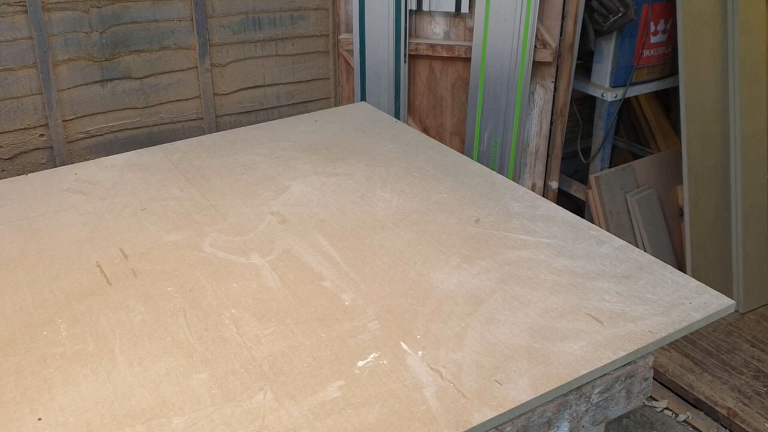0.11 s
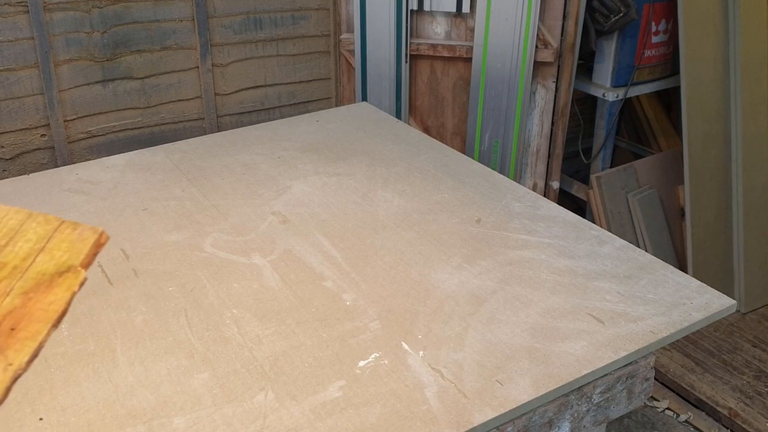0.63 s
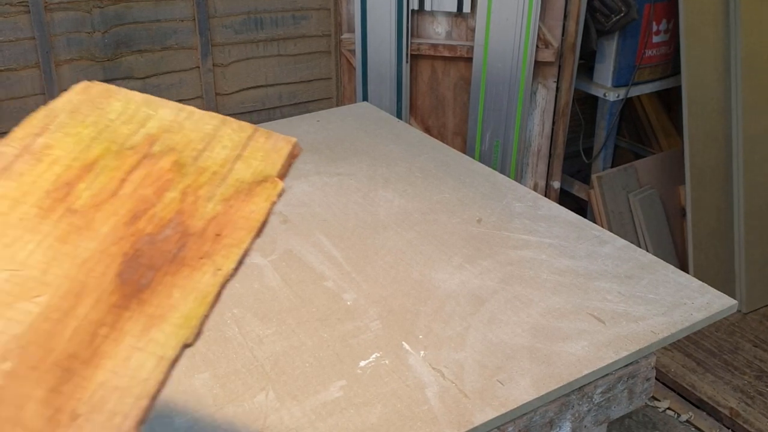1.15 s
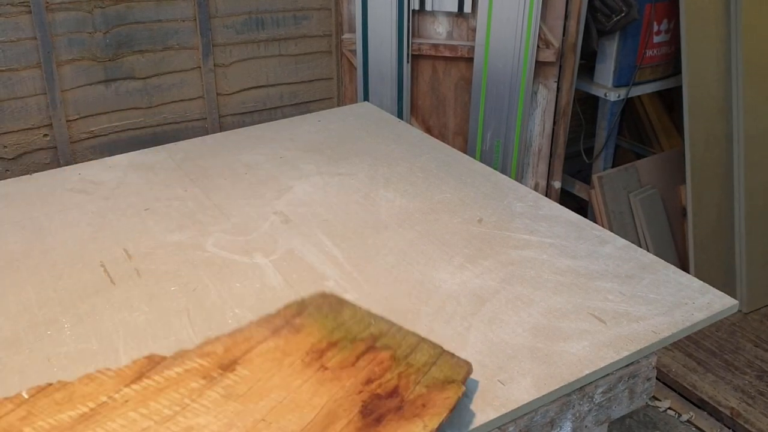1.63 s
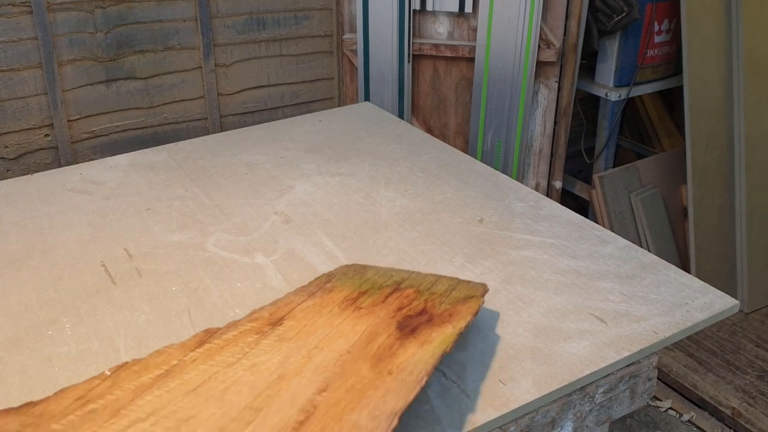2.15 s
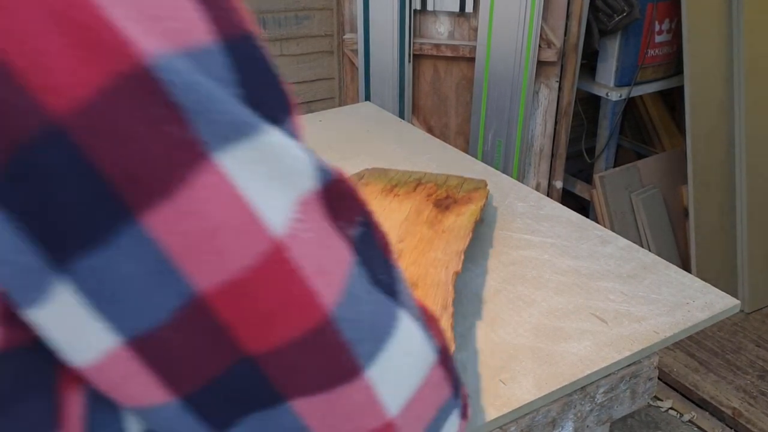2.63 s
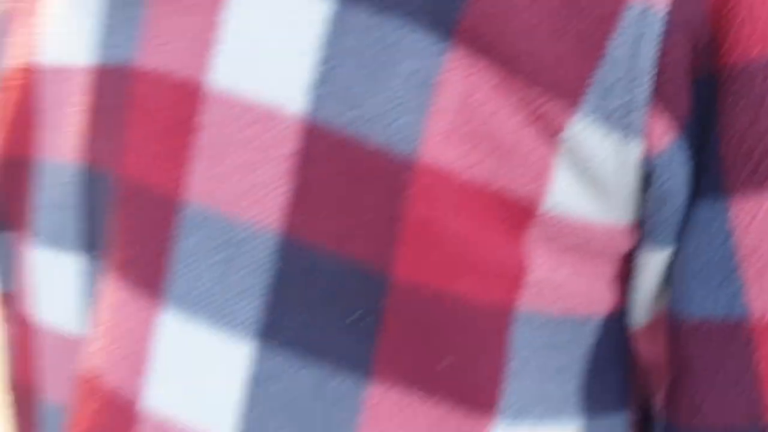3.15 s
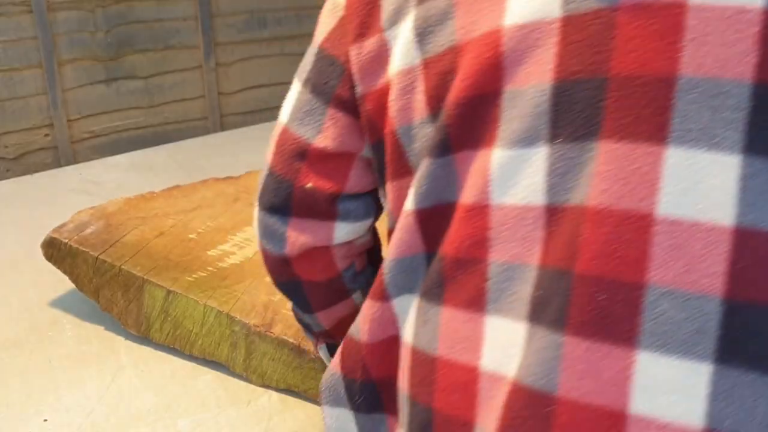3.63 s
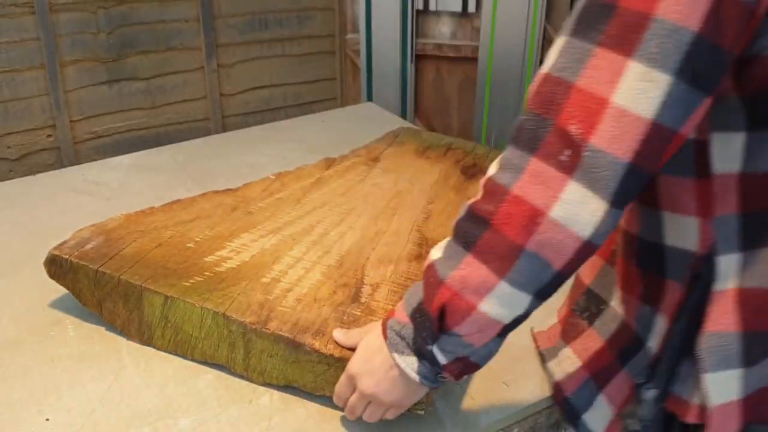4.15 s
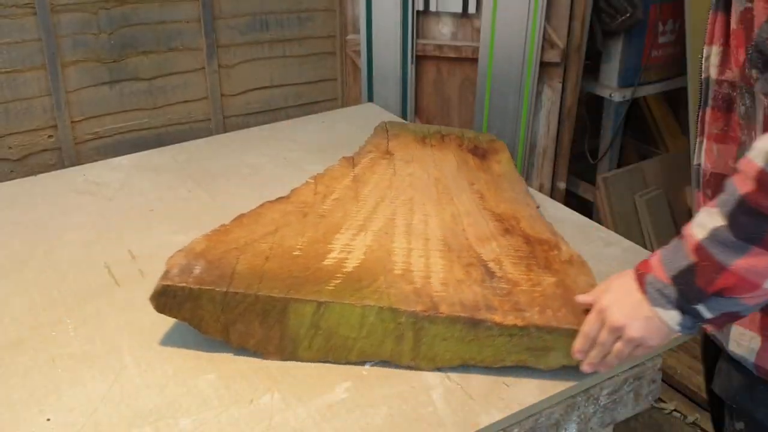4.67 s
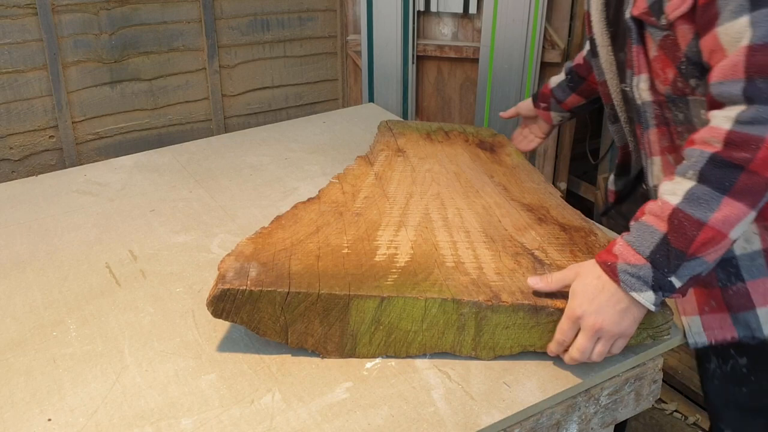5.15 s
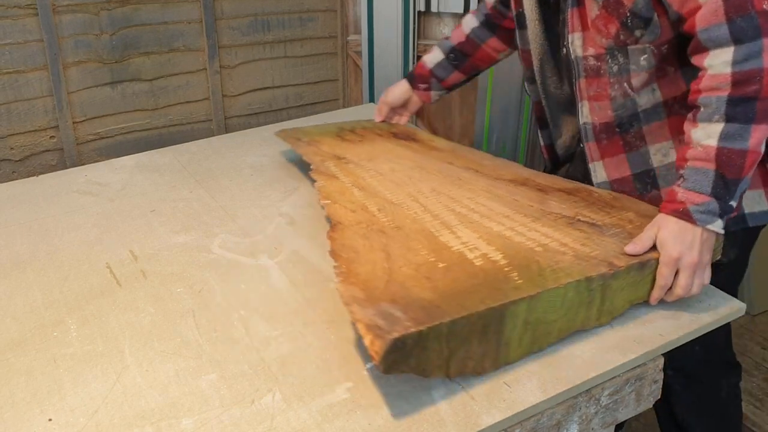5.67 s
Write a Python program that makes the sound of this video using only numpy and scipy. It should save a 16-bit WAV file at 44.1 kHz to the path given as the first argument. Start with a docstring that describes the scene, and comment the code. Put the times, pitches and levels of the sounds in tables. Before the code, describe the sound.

A heavy wooden slab slams onto a bench with a deep boom, is dropped again, scraped about, and lands with a final solid thud.

```python
"""A heavy wooden slab is carried in, dropped on a workbench, rocked and slid about in a small wooden shed.
Each blow rings the modes of the bench and slab, with a deep boom a moment later, a crack and a clatter.
Scuffs and drags are grainy noise coloured by the same wood; ticks are tiny noise bursts, and a groan is
a wavering tone. A low rumble and faint hiss fill the shed.
A close pair of microphones hears it all a little louder on the left."""
import sys
import numpy as np
from scipy import signal
from scipy.fft import rfft, irfft, next_fast_len
from scipy.io import wavfile
from scipy.ndimage import uniform_filter1d

SR = 44100
rng = np.random.default_rng(int(sys.argv[2]) if len(sys.argv) > 2 else 0)


def transcribe(u):
    """Save the signal u as a 16-bit wav file named by the first command-line argument.

    u: samples, shape (n,) or (channels, n), limited to [-1, 1]; the rate is SR.
    q: integer samples, one column per channel.
    """
    v = np.clip(np.atleast_2d(u).T, -1, 1)
    q = np.round(v * 32767).astype(np.int16)
    wavfile.write(sys.argv[1], SR, q)


def rack_gain(trim_db):
    """Turn a fader trim in dB into the linear factor to multiply a signal by."""
    fader = np.asarray(trim_db, float)
    return 10 ** (fader / 20)


N = 255055  # length in samples
HZ = np.maximum(np.arange(N // 2 + 1) * SR / N, 1)  # frequency of every bin


def over_hz(table):
    """Read a (frequency, value) table at every bin, in straight lines over log frequency."""
    hz, value = np.transpose(table)
    return np.interp(np.log(HZ), np.log(hz), value)


def colour(x, gain):
    """Weight every frequency bin by its gain."""
    return irfft(rfft(x) * gain, N)


def unit(x):
    """Scale to rms 1."""
    return x / np.sqrt(np.mean(x ** 2))


def add(out, s, x):
    """Mix x into out from time s."""
    i = int(s * SR)
    out[..., i:i + x.shape[-1]] += x[..., :N - i]


def walk(rate):
    """Random levels with rms 1, held 1 / rate seconds and smoothed twice."""
    hold = int(SR / rate)
    steps = np.repeat(rng.standard_normal(N // hold + 1), hold)
    smooth = uniform_filter1d(uniform_filter1d(steps, hold), hold)
    return unit(smooth[:N])


def rise_and_fall(t, s, hold, rise, fall):
    """Level in dB: climbs 20 dB per rise time up to s, holds, sinks 20 dB per fall time."""
    before = np.maximum(s - t, 0)
    after = np.maximum(t - s - hold, 0)
    return -20 * (before / rise + after / fall)


# likeness of the two microphones: (frequency [Hz], share alike [0-1])
MICROPHONES_ALIKE = [(60, 1), (250, 0.89), (600, 0.65), (1200, 0), (2500, 0.09), (8000, 0)]


def pair(x, other):
    """Two microphones: alike in the bass, hardly related in the treble."""
    alike = np.clip(over_hz(MICROPHONES_ALIKE), 0, 1)
    mid = colour(x, np.sqrt((1 + alike) / 2))
    side = colour(other, np.sqrt((1 - alike) / 2))
    return np.array([mid + side, mid - side])


def grit(spectrum, spiky_db, flicker_db, rate):
    """Dense grains of uneven size under a flickering pressure, coloured, for both microphones."""
    size = rack_gain(spiky_db * rng.exponential(size=N) + flicker_db * walk(rate))
    grains = pair(size * rng.standard_normal(N), size * rng.standard_normal(N))
    return unit(colour(grains, rack_gain(over_hz(spectrum))))


# colour of the low rumble and faint hiss: (frequency [Hz], relative level per Hz [dB])
SHED_COLOUR = [(12, -58), (20, -19), (49, 3), (86, -0.5), (168, -12.5), (285, -16.5), (347, -19),
               (590, -23.5), (923, -21.5), (1530, -34), (2320, -44), (6540, -50), (7730, -58),
               (11400, -45.5), (16000, -58)]


def shed_noise(level_db=-50):
    """The low rumble and faint hiss that fill the shed: gently flickering coloured noise."""
    return rack_gain(level_db) * grit(SHED_COLOUR, 0.3, 1.2, 12)


# short scuffs of shoes, sleeves and slab edge:
# (time [s], hold [s], grit level [dB], woodiness over grit [dB], dustiness over grit [dB])
SCUFF_EVENTS = [(0.033, 0.096, -49, -1.5, -6), (0.116, 0.064, -52, 4.5, -4.5), (0.26, 0.054, -55, 6, -1),
                (0.627, 0.035, -77, -0.5, 2), (0.895, 0.059, -83.5, 16, 3), (0.99, .03, -62, 1.5, -7),
                (1.051, 0.022, -51, 4.5, -2), (1.135, 0.12, -71, 8, -2), (1.479, 0.0017, -76.5, 11, 9.5),
                (1.618, 0.021, -61.5, -1.5, -15), (1.673, 0.0017, -52, 21.5, -10),
                (1.696, 0.014, -45.5, 0, -1.5), (1.856, 0.042, -42.5, 7, -6.5),
                (2.059, 0.019, -64, 11.5, -15), (2.445, .006, -60, 9.5, -4), (2.522, 0.023, -49.5, -7.5, 1),
                (2.927, .006, -53.5, 11, -6), (3.02, 0.043, -57.5, 6.5, -4),
                (3.101, 0.0025, -51.5, 1.5, -10.5), (3.168, 0.0038, -57, 5, -12), (3.22, 0.048, -52, 1, -3),
                (3.332, 0.11, -60.5, 7, -7.5), (3.525, 0.06, -66, 6.5, -1.5), (3.599, .004, -50.5, 1, -1.5),
                (3.674, 0.12, -65.5, 2, -5), (3.818, 0.012, -60.5, 12.5, -6),
                (3.888, 0.12, -67.5, 5.5, 0.5), (4.05, 0.047, -58.5, 1.5, -5.5),
                (4.705, 0.024, -46, -7, -8), (5.006, 0.035, -59, 3, 0.5), (5.195, 0.21, -65.5, 7, -0.5),
                (5.276, 0.0057, -46, -2, -10.5), (5.769, 0.022, -47.5, -3, -6)]


def scuffs(t, rise_s=0.0042, rise_per_hold=0.49, fall_s=0.075, grumble_db=-2):
    """Short rubs swell, hold and fade: summed powers of grit, dust, rasp and grumble over time."""
    power = np.zeros((4, len(t)))
    for s, hold, db, wood_db, dust_db in SCUFF_EVENTS:
        # longer scuffs also rise more slowly
        db = db + rise_and_fall(t, s, hold, rise_s + rise_per_hold * hold, fall_s)
        rasp_db = db + wood_db
        power += rack_gain([db, db + dust_db, rasp_db, rasp_db + grumble_db]) ** 2
    return power


def scatter(x, drift_hz=2.5, decay_s=0.009, level_db=-4):
    """Early echoes off bench top and planks comb the sound into bands that shift as the contact moves."""
    echoes = rng.standard_normal((2, 2, 2048)) * np.exp(-np.arange(2048) / SR / decay_s)
    echoes = rack_gain(level_db) * echoes / np.sqrt(np.sum(echoes ** 2, axis=2, keepdims=True))
    # a wandering angle blends one cluster of echoes into the other
    turn = 2 * walk(drift_hz)
    moving = np.zeros((2, N))
    for share, cluster in zip((np.cos(turn), np.sin(turn)), echoes):
        moving += signal.fftconvolve(share * x, cluster, axes=1)[:, :N]
    return (x + moving) / np.hypot(1, rack_gain(level_db))


# colours of the four rubbing sounds, each: (frequency [Hz], relative level per Hz [dB])
SAND_COLOUR = [(1710, -57), (2900, -4), (3440, -3), (3800, -3.5), (5020, -5.5), (6470, -7.5), (7500, -14),
               (9750, -57), (16500, -120)]
DUST_COLOUR = [(4290, -9), (7300, -3), (8470, -3.5), (12500, -0.5), (13700, -8), (15100, -2), (15800, -37)]
RASP_COLOUR = [(760, -16), (1300, -8), (1360, -3), (1600, -2.5), (1800, -4), (2280, -2), (2560, -7),
               (3100, -3.5), (4030, -16), (6820, -120)]
GRUMBLE_COLOUR = [(120, -60), (200, -6), (237, -6.5), (275, -8.5), (329, -3.5), (371, -11.5), (498, -7.5),
                  (591, -7), (724, -10), (773, -3.5), (1010, -8.5), (1180, -6), (1400, -11.5), (1820, -30),
                  (3080, -120)]


def slide(ring_db=3, blur=1.43):
    """Wood on wood and shoes on the floor: grit, dust, and a rasp and grumble that wake the wood's modes."""
    t = np.arange(0, N, 32) / SR
    power = scuffs(t) + drags(t)
    gains = [np.interp(np.arange(N) / SR, t, np.sqrt(p)) for p in power]
    sandy, dusty, raspy, grumbly = gains
    # each mode is a peak in the wood's response; quickly dying modes are wider
    peaks = 0
    for hz, _, t60, _, _ in WOOD_MODES:
        width = blur * np.log(1000) / np.pi / t60
        peaks = peaks + 1 / (1 + (2 * (HZ - hz) / width) ** 2)
    wood = 1 + rack_gain(ring_db) * peaks
    surface = sandy * grit(SAND_COLOUR, 2.6, 1.4, 40) + dusty * grit(DUST_COLOUR, 1.8, 1.67, 40)
    rasp = unit(colour(grit(RASP_COLOUR, 3.08, 2.1, 30), wood))
    grumble = unit(colour(grit(GRUMBLE_COLOUR, 2.86, 1.28, 18), wood))
    return scatter(surface + raspy * rasp) + grumbly * grumble


# ringing modes of bench and slab: (frequency [Hz], relative level [dB], time to die by 60 dB
# before muffling [s], swell time [cycles], phase by which the left microphone leads [radians])
WOOD_MODES = [(64.6, -1.5, 0.22, 0.18, -0.2), (77.5, 7, 0.4, 1.03, 0.17), (102.5, 3, 0.12, 1.35, 0),
              (152.8, -2.5, 0.18, 0.96, 0.2), (244.8, 3, 0.086, 1.8, 0.18), (321, -6.5, 0.12, 0.36, 0.2),
              (420, -2.5, 0.032, 0.77, 1.2), (502.4, 4, 0.063, 2.7, 0), (566.2, -4.5, 0.35, 0.84, -2.8),
              (649, 3.5, 0.091, 1.6, 3.2), (717.3, -3, 0.071, 0.39, 0.6), (955, -1.5, 0.036, 0.25, 1.5),
              (1113.5, -2, 0.033, 1.8, -0.76), (1247, -4.5, 0.057, 0.37, 2), (1429, -11, 0.053, 0.58, -3),
              (1629, -4.5, 0.02, 1.4, 1), (1907, 3, 0.011, 2.1, -3.5), (2124, -26, 0.088, 1.6, -7),
              (2330, -32.5, 0.066, 1.6, -0.8), (2550, -32, 0.0097, 0.84, 10), (2692, -33, 0.072, 1.8, -1.6)]
# borders between five families of modes, boom, thud, body, knock and crack: (frequency [Hz])
FAMILY_BORDERS = [120, 190, 380, 850]
# blows: (time [s], body level [dB], boom level [dB], knock level [dB], crack level [dB])
BLOW_EVENTS = [(0.316, -36.5, -50, -49, -44), (0.492, -46, -65, -59, -59), (0.98, -52, -58, -53.5, -64),
               (1.388, -53, -47, -75, -72), (1.599, -47, -57, -53.5, -60), (1.67, -9, -23, -13.5, -13.5),
               (1.683, -26.5, -25, -28, -26), (1.701, -25.5, -29, -30, -35), (1.769, -20, -26, -28.5, -54),
               (1.8, -39, -32, -53, -62), (1.849, -55, -39, -52, -41), (1.888, -35, -29, -40, -25),
               (1.897, -22.5, -29.5, -32, -47), (1.917, -25, -29.5, -36, -47), (1.939, -26, -51, -58, -62),
               (2.868, -15, -26, -33.5, -30), (2.876, -14, -32.5, -22.5, -23.5),
               (2.889, -22.5, -20.5, -31, -38), (3.005, -25.5, -19, -30.5, -39),
               (3.014, -25.5, -27, -36, -32.5), (3.045, -25, -34.5, -52, -52), (3.125, -28, -42, -43, -51),
               (3.181, -42, -37.5, -59, -65), (3.227, -42, -39.5, -62, -58), (3.328, -36, -62, -47, -61),
               (3.362, -27, -27.5, -51, -63), (3.422, -25.5, -34.5, -41.5, -56),
               (3.569, -39.5, -36.5, -54, -66), (3.815, -22, -20, -37, -38), (4.31, -47.5, -38, -61, -59),
               (4.501, -37.5, -57, -49, -44), (4.541, -38.5, -39.5, -44.5, -41),
               (4.731, -39.5, -52, -57, -34.5), (4.993, -44.5, -62, -55, -66),
               (5.284, -56, -56, -60, -38.5), (5.41, -41, -51, -49, -48), (5.456, -30.5, -35, -47, -32.5),
               (5.573, -40, -61, -54, -44), (5.697, -32.5, -39, -51, -46),
               (5.767, -20.5, -12.5, -12, -15.5)]


def blows(scatter_db=2.3, detune=0.0052, crack_s=0.003, rattle_db=-12, rattle_s=0.019,
          splinter_db=-3, clatter_db=-2, clatter_s=0.033):
    """Each blow makes the modes swell, then die; contact adds a splintery crack, a rattle and a clatter."""
    bite_s = 0.0022  # contact begins this long before a blow is heard to bite
    boom_late_s = 0.003
    thud_body, thud_db = 0.8, 1  # the thud lies between boom and body: share of body, added dB
    choke_s, choke_t60_s = 0.058, 1  # the slab settles this late and muffles the ringing
    out = np.zeros((2, N))
    t = np.arange(SR // 2) / SR
    hz, db, t60, swell, lead = np.transpose(WOOD_MODES)[:, :, None]
    family = np.searchsorted(FAMILY_BORDERS, hz)
    # the frame and floor take up the boom a little after the top rings
    age = np.maximum(t - boom_late_s * (family == 0), 0)
    growth = 1 - np.exp(-age * hz / swell)
    decay = np.exp(-np.log(1000) * (age / t60 + np.maximum(age - choke_s, 0) / choke_t60_s))
    sign = (-1.) ** np.arange(len(hz))[:, None]
    chance = rng.standard_normal((len(BLOW_EVENTS), 2, len(hz), 1))
    # the crack dies at once, the rattle lingers
    short = t[:5000]
    fade = np.exp(-short / crack_s) + rack_gain(rattle_db) * np.exp(-short / rattle_s)
    splinters = rng.standard_normal((len(BLOW_EVENTS), 2, 5000)) * fade
    soft = signal.butter(2, [750, 2700], "bandpass", fs=SR, output="sos")
    # countless weak modes of loose boards blur into a dull clatter
    boards = signal.butter(3, [170, 480], "bandpass", fs=SR, output="sos")
    loose = np.exp(-short / clatter_s) / fade
    for event, (level_chance, pitch_chance), noise in zip(BLOW_EVENTS, chance, splinters):
        s, body_db, boom_db, knock_db, crack_db = event
        start = s - bite_s
        thud_db_now = boom_db + thud_body * (body_db - boom_db) + thud_db
        reach_db = np.array([boom_db, thud_db_now, body_db, knock_db, crack_db])[family]
        level = sign * rack_gain(db + reach_db + scatter_db * level_chance)
        wave = np.exp(2j * np.pi * hz * (1 + detune * pitch_chance) * age)
        ring = level * growth * decay * wave
        left, right = (np.sum(ring * np.exp(side * 0.5j * lead), axis=0).imag for side in (1, -1))
        add(out, start, np.array([left, right]))
        add(out, start, rack_gain(crack_db + splinter_db) * signal.sosfilt(soft, noise))
        # the clatter is much the same at both microphones
        clatter = signal.sosfilt(boards, loose * (noise + 2 * noise[0]))
        add(out, start, rack_gain(body_db + clatter_db) * clatter)
    return out


# small dry ticks: (time [s], level [dB])
TICK_EVENTS = [(0.5025, -57), (0.522, -55), (0.5385, -50), (0.6282, -52), (0.661, -55), (0.7125, -56),
               (0.7445, -54.5), (0.791, -56), (0.9896, -54), (1.477, -56.5), (1.6107, -59), (1.813, -41),
               (3.012, -48), (3.105, -37), (3.155, -56), (3.179, -39.5), (4.0567, -50), (5.2745, -36.5)]
# broad rings of a tick: (frequency [Hz], width [Hz], level [dB])
TICK_RINGS = [(4680, 1000, 9), (6850, 1500, -3), (11500, 5000, 1.5)]


def ticks(decay_s=0.0008):
    """Crumbs and fibres snapping: about a millisecond of noise in three broad rings."""
    out = np.zeros(N)
    fade = np.exp(-np.arange(600) / SR / decay_s)
    bursts = rng.standard_normal((len(TICK_EVENTS), 600)) * fade
    for (s, db), noise in zip(TICK_EVENTS, bursts):
        add(out, s, rack_gain(db) * noise)
    rings = sum(rack_gain(db) / (1 + (2 * (HZ - hz) / width) ** 2) for hz, width, db in TICK_RINGS)
    return colour(out, rings)


# the slab dragged over the bench, one list of points per drag:
# (time [s], grit level [dB], woodiness over grit [dB], dustiness over grit [dB])
DRAG_PATHS = [
    [(1.74, -70, 3, -8), (1.8, -58, 4, -11), (2.1, -64, 2.5, -2.5), (2.45, -58.5, 4.5, -2),
     (2.55, -54, 1.5, 2), (2.86, -53, 3, -0.5), (2.93, -55.5, 10.5, -4), (3, -83, 0, -7)],
    [(4.12, -70, 3.5, -1), (4.21, -60.5, 1, -3.5), (4.5, -51, -3.5, -5.5), (4.8, -50, -1.5, -6),
     (4.91, -55, -4.5, -8), (4.98, -74, 4, -10)],
    [(5.3, -80, -8, -15), (5.38, -63, 6, -10), (5.42, -45.5, 2.5, -3), (5.47, -42, -5.5, -1.5),
     (5.63, -49, -6, -2), (5.71, -52, -0.5, 0.5), (5.76, -60, 0.5, 1)],
]


def drags(t, edge_s=0.075, grumble_db=3.5):
    """Long rubs follow their points: summed powers of grit, dust, rasp and grumble over time."""
    power = np.zeros((4, len(t)))
    for path in DRAG_PATHS:
        s, *columns = np.transpose(path)
        db, wood_db, dust_db = (np.interp(t, s, column) for column in columns)
        db = db + rise_and_fall(t, s[0], s[-1] - s[0], edge_s, edge_s)
        rasp_db = db + wood_db
        power += rack_gain([db, db + dust_db, rasp_db, rasp_db + grumble_db]) ** 2
    return power


def groan(waver_db=0.5, waver=0.0061):
    """Stick and slip of the dragged slab lock briefly near one mode: a tone wavering in pitch and level."""
    peak_s, hz, peak_db = 4.735, 241, -39
    rise_s, fall_s = 0.063, 0.044  # times to change by 20 dB
    shape_db = rise_and_fall(np.arange(N) / SR, peak_s, 0, rise_s, fall_s)
    db = peak_db + shape_db + waver_db * walk(60.9)
    phase = 2 * np.pi * np.cumsum(hz * (1 + waver * walk(22))) / SR
    return rack_gain(db) * np.sin(phase)


def room(x, t60_s=0.28, tail_db=-2):
    """Direct sound plus a short noise-like tail off the plank walls, thinned in the bass."""
    t = np.arange(N) / SR
    fade = np.exp(-np.log(1000) * t / t60_s) * (1 - np.exp(-t / 0.0011))
    tail = pair(fade * rng.standard_normal(N), fade * rng.standard_normal(N))
    tail = colour(tail / np.sqrt(np.sum(fade ** 2)), 1 / (1 + (330 / HZ) ** 2))
    size = next_fast_len(N + SR)
    echo = irfft(rfft(np.mean(x, axis=0), size) * rfft(tail[:, :SR], size), size)[:, :N]
    return x + rack_gain(tail_db) * echo


# balance of the microphones: (frequency [Hz], left over right [dB])
LEFT_LEAN = [(100, 3), (2000, 4), (4000, 2.5), (8000, 4), (14000, 8.5)]


def lean_left(x):
    """Raise the left microphone and lower the right, each by half the difference."""
    half_db = over_hz(LEFT_LEAN) / 2
    return colour(x, rack_gain(np.array([half_db, -half_db])))


def scene():
    """All sources together, leaning to the left microphone."""
    in_room = room(blows() + ticks() + groan())
    return lean_left(in_room + slide() + shed_noise())


def low_pass(x):
    """Removes everything above the highest recorded frequency."""
    return signal.sosfilt(signal.butter(12, 16280, fs=SR, output="sos"), x)


def record(dry):
    """The microphones lose the deepest bass; the sound opens a moment after the start."""
    start_s, opening_s = 0.046, 0.00039
    thin = signal.sosfilt(signal.butter(2, 38, "highpass", fs=SR, output="sos"), dry)
    opening = np.clip((np.arange(N) / SR - start_s) / opening_s, 0, 1)
    return low_pass(thin * opening)


dry = scene()
out = record(dry)
transcribe(out)
```